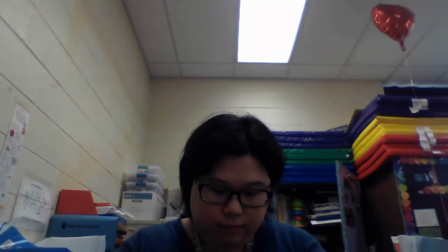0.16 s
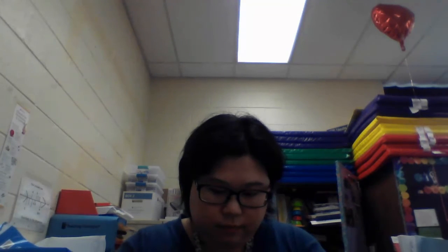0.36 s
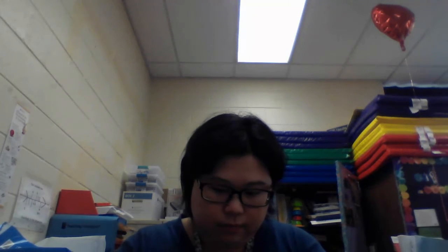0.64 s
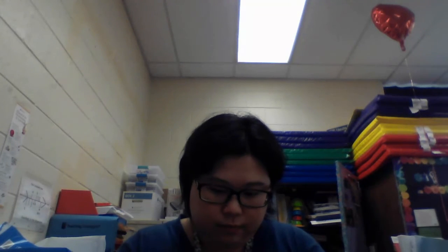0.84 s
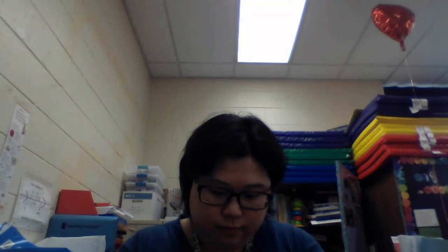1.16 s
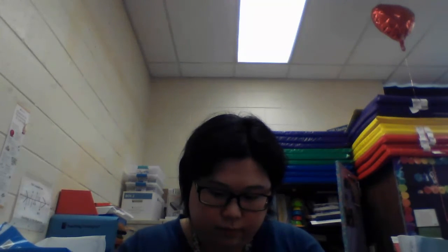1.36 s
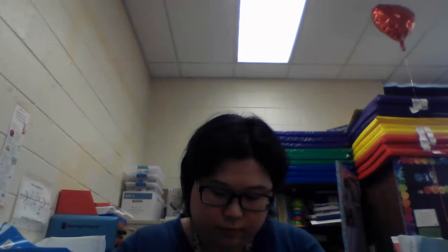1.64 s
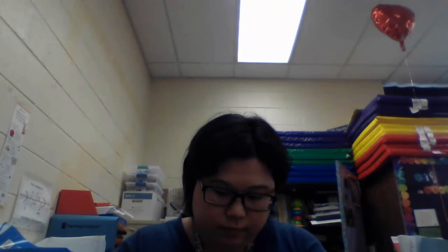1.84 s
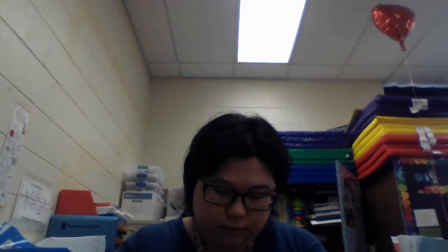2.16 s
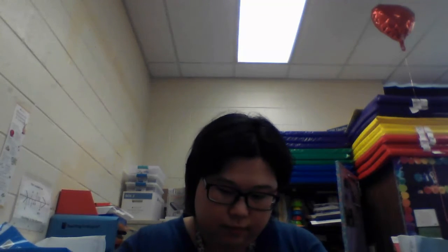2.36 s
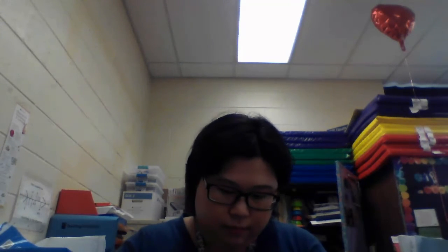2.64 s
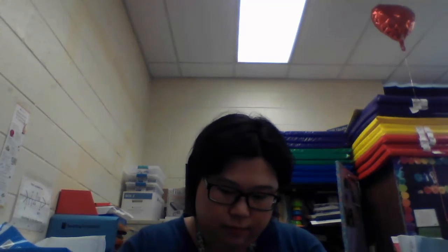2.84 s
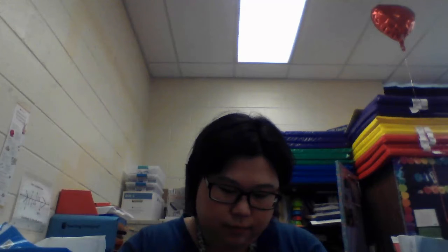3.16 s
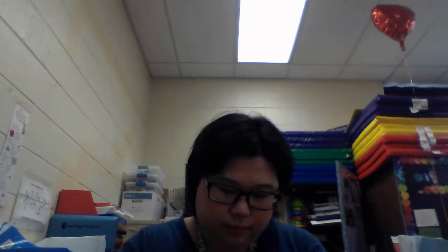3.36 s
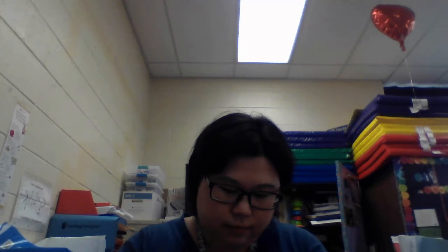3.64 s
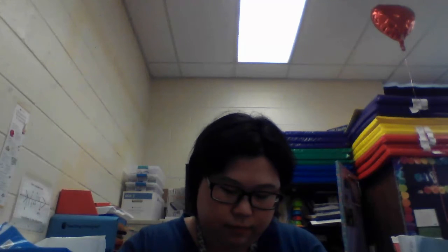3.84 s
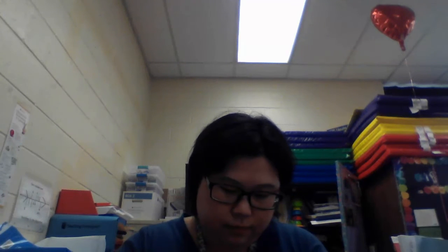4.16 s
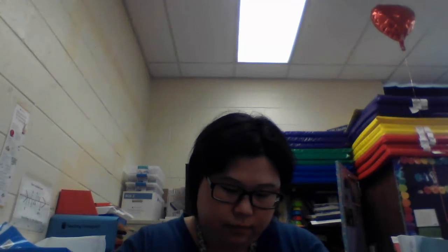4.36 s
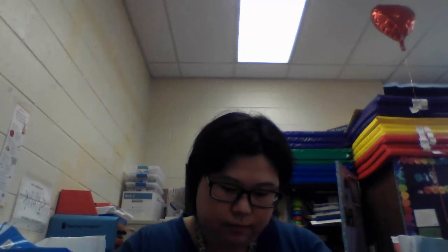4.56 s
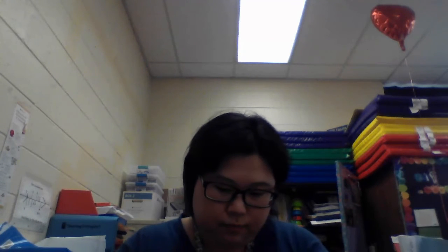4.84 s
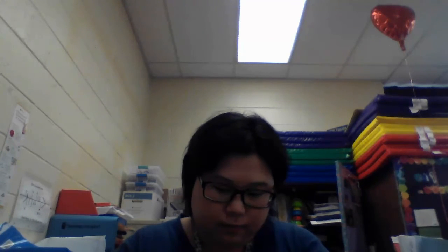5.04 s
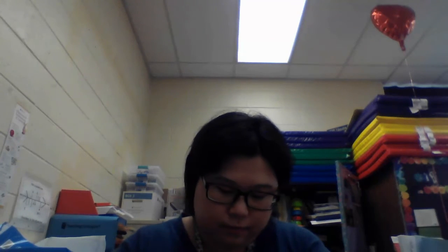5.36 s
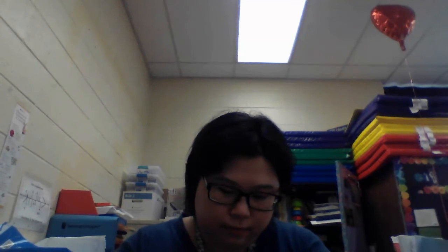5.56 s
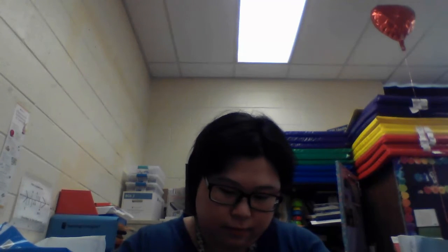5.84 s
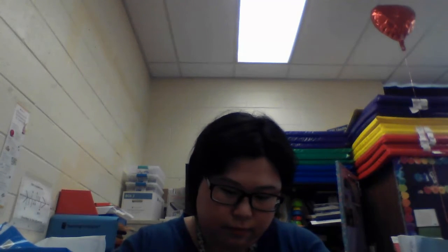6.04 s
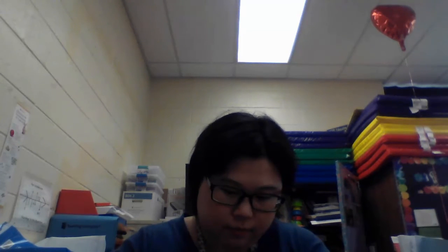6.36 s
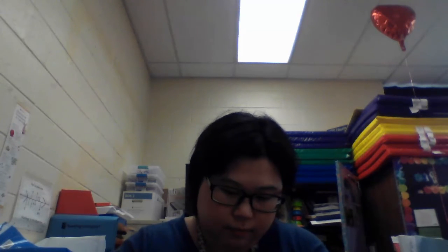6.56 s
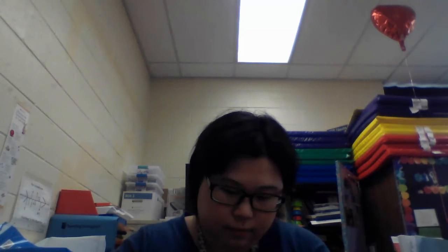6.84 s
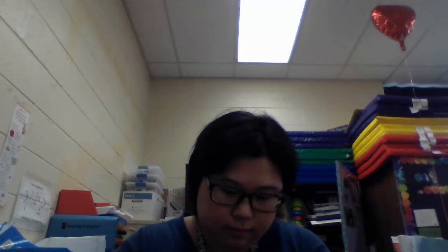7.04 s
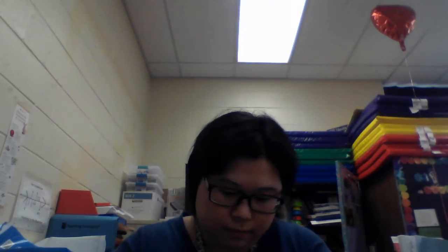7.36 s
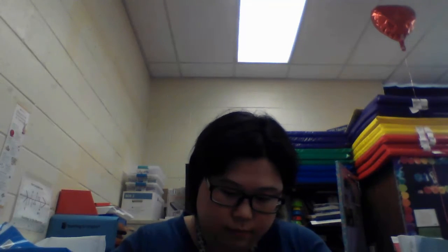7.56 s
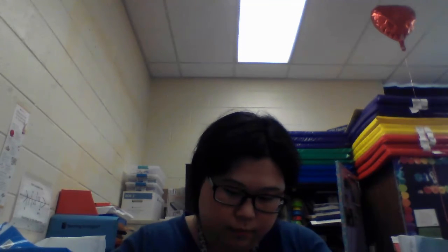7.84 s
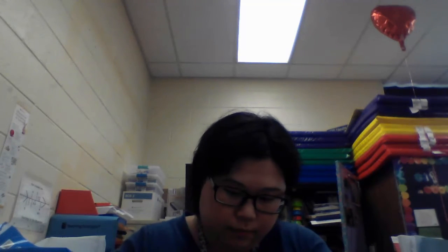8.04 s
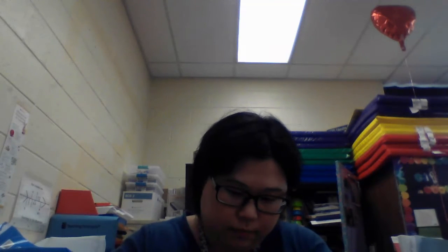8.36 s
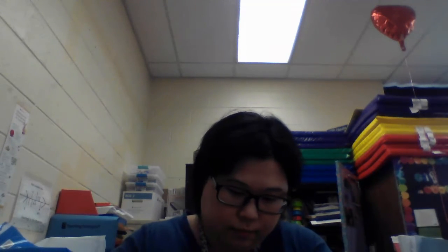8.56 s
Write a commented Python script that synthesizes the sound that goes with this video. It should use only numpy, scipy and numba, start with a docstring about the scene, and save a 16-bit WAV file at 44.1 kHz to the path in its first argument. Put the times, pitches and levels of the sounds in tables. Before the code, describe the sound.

Hard, short, hollow table knocks from a crayon set down repeatedly, with papery clicks and thin hissing drags much quieter than the taps. It begins unevenly, rests for about a second, then continues at a loose steady pace to the end, the last taps strong and close together. Small dry room, close microphone, background hum and ventilation mostly suppressed.

```python
"""A wax crayon is set down hard on paper over a table, dragged in a short stroke and lifted, again and again.
Each touch excites decaying table modes, filtered-noise rattle and a rough click of crayon on paper.
Each stroke is grainy noise: a hiss from the paper fibres over a rumble of the table top.
A laptop microphone hears it in a small quiet room with a hum and ventilation noise.
Its noise suppressor holds this background far down and opens for a moment after loud sounds."""
import sys
import numpy as np
from scipy import signal
from scipy.fft import rfft, irfft
from scipy.io import wavfile
from scipy.ndimage import uniform_filter1d
from numba import njit

SR = 44100
rng = np.random.default_rng(int(sys.argv[2]) if len(sys.argv) > 2 else 0)


def output_pcm(signal):
    """Save a mono or channel-first signal as 16-bit PCM at the path in sys.argv[1].

    Samples are clipped to [-1, 1] before scaling.
    """
    pcm = np.clip(np.atleast_2d(signal).T, -1, 1) * 32767
    wavfile.write(sys.argv[1], SR, np.round(pcm).astype(np.int16))


N = 383229
TIME = np.arange(N) / SR

# Contacts of the crayon with paper and table.
# Each row: time in seconds, then drive levels of table knock, crayon click and low thump, each in dB.
TOUCHES = [(0.025, -29.5, -9.5, -57), (0.037, -31, -21, -64), (0.046, -32, -24.5, -45),
           (0.096, -43, -28.5, -49), (0.159, -46, -38, -49), (0.235, -3, -25, -37.5),
           (0.244, -33, -28, -46), (0.33, -43, -45, -46.5), (0.384, -38.5, -51, -52.5),
           (0.439, -35.5, -50, -57), (0.469, -33.5, -36, -67), (0.478, -27, -15.5, -71),
           (0.487, -30, -23.5, -75), (0.499, -27, -23, -52), (0.554, -46, -60, -48.5),
           (0.659, -3, -30, -44), (0.668, -26, -27, -39), (0.871, -62, -41, -84), (0.889, -31.5, -18, -69),
           (0.903, -30, -23.5, -59), (0.922, -29.5, -27, -55), (0.936, -47, -31, -67),
           (0.956, -50, -34.5, -59), (1.197, -67, -63.5, -79), (1.369, -62, -67.5, -81.5),
           (1.588, -70, -80.5, -84), (1.876, -48.5, -77.5, -87.5), (2.054, -9.5, -44, -43),
           (2.272, -25, -35, -52.5), (2.287, -55, -45, -61), (2.483, -3.5, -30.5, -34.5),
           (2.492, -27.5, -44.5, -42.5), (2.682, -23.5, -31, -48.5), (2.696, -34, -35.5, -53),
           (2.71, -58, -45.5, -58), (2.876, -6.5, -38, -39.5), (3.306, -5, -28.5, -42.5),
           (3.454, -43, -71.5, -72), (3.497, -39, -69, -60), (3.515, -33.5, -43.5, -83.5),
           (3.529, -49.5, -49, -74.5), (3.707, -9, -52, -49), (4.108, -6, -35.5, -43.5),
           (4.483, -29.5, -35, -62.5), (4.491, -9.5, -33.5, -48.5), (5.042, -27, -35.5, -78),
           (5.058, -35, -30.5, -71), (5.09, -45.5, -47.5, -64), (5.167, -55.5, -64.5, -65),
           (5.251, -31, -39, -55), (5.265, -8.5, -43.5, -44.5), (5.651, -51, -67, -76.5),
           (5.818, -2, -38.5, -42), (6.177, -20.5, -77, -67), (6.262, -44, -77, -73),
           (6.527, -5, -38, -38.5), (6.896, -8, -38.5, -52.5), (7.09, -43.5, -46, -76),
           (7.111, -34, -64, -63.5), (7.296, -44, -36, -69), (7.307, -47, -48.5, -70.5),
           (7.34, -65.5, -37, -72), (7.613, -12.5, -55, -49), (7.745, -46, -50.5, -64.5),
           (7.956, -3, -30.5, -36.5), (8.297, -1, -32, -35), (8.322, -22, -37.5, -41),
           (8.613, -1, -25.5, -37.5), (8.636, -17.5, -24.5, -64)]


def touches():
    """Impact excitation: a blow rings, rattles and sways the table; the click is a short rough noise burst."""
    # Spectrum of the after-sound of a knock. Each row: frequency in Hz, relative level in dB.
    rattle_spectrum = [(150, -33), (260, -2), (320, -21), (450, -12.5), (700, -1), (1300, -4.5), (1700, -8),
                       (2100, -14), (3000, -18.5), (5000, -31), (12000, -43)]
    # Spectrum of the click. Each row: frequency in Hz, relative level in dB.
    click_spectrum = [(800, -31.5), (1400, -9), (2100, -24.5), (2900, -5), (3800, -7.5), (4550, 2),
                      (5000, -2.5), (5500, -4.5), (6300, -4), (7300, -16), (8200, -22), (9500, -16),
                      (11000, -25.5), (13000, -55)]
    _, knock_db, click_db, thump_db = np.transpose(TOUCHES)
    push, tap = blows(knock_db), blows(click_db)
    # the paper is pressed flat a few milliseconds before the tip reaches the table
    pressed = np.roll(swell(push, 0.003, 0.03), -int(0.006 * SR))

    after = undb(-15.5) * swell(push, 0.002, 0.074)
    after += undb(-28.0) * swell(push, 0.018, 0.22)
    after += undb(-23.0) * pressed
    rattle = patchy(colour(rng.standard_normal(N), rattle_spectrum), 3.5) * after

    burst = undb(8) * swell(tap, 0.0008, 0.016)
    burst += undb(-4.5) * swell(tap, 0.005, 0.022)
    burst += undb(-38) * pressed
    grit = undb(2.5 * walk(500))
    click = patchy(colour(rng.standard_normal(N), click_spectrum), 3.0, size=256) * burst * grit
    return knocks(knock_db) + rattle + booms(thump_db) + click


def knocks(db):
    """Modal excitation: every blow lands on a new spot, so it stirs the table modes in new shares."""
    # Modes of the table top. Each row: frequency in Hz, mean relative level in dB, 60 dB decay in seconds.
    table_modes = [(257, -31, 0.12), (392, -21, 0.057), (560, -37.5, 0.045), (627.2, -13, 0.14),
                   (868, 2, 0.02), (1108.6, -0.5, 0.013), (1254, 14, 0.0088), (1462, 1, 0.018),
                   (2026, 5.5, 0.016), (2543, -4, 0.014), (2880, -16.5, 0.028)]
    force = blows(db, rebound_s=0.002206, rebound=0.75)
    out = np.zeros(N + SR)
    spots = rng.standard_normal((len(TOUCHES), len(table_modes)))
    for (s, *_), spot in zip(TOUCHES, spots):
        at = int(s * SR)
        modes = [(hz, level_db + 1.2 * shift, t60)
                 for (hz, level_db, t60), shift in zip(table_modes, spot)]
        contact = force[at:at + SR // 300]  # long enough to hold the rebound
        sound = np.convolve(contact, ring(modes))
        out[at:at + len(sound)] += sound
    return out[:N]


def ring(modes, rise_s=0.0012):
    """Modal superposition: a sum of damped sines, which swell while the wax gives; peak 1."""
    t = TIME[:SR // 8]
    y = np.zeros(len(t))
    for k, (hz, db, t60) in enumerate(modes):
        sign = (-1) ** k  # neighbouring modes start in opposite directions
        y += sign * undb(db) * np.sin(2 * np.pi * hz * t) * 1000. ** (-t / t60)
    y *= 1 - np.exp(-(t / rise_s) ** 2)
    return y / np.abs(y).max()


def booms(thump_db):
    """Resonant build-up: the heavy low modes take a few cycles to reach their peak."""
    # Low table modes. Each row: frequency in Hz, time to the peak in seconds.
    low_modes = [(102, 0.017), (174, .045)]
    # Level of each low mode against the thump, in dB.
    low_mode_db = [-1, 0]
    t = TIME[:SR // 2]
    response = np.zeros(len(t))
    for (hz, peak_s), db in zip(low_modes, low_mode_db):
        envelope = (t / peak_s * np.exp(1 - t / peak_s)) ** 2
        response += undb(db) * envelope * np.sin(2 * np.pi * hz * t)
    return signal.fftconvolve(blows(thump_db), response)[:N]


def blows(db, rebound_s=0., rebound=0.):
    """Impulsive force: one impulse a touch, and a rebound of uneven size and delay just after it."""
    force = np.zeros(N + SR)
    at = np.transpose(TOUCHES)[0] * SR
    late, weak = rng.random((len(at), 2)).T
    again = at + rebound_s * SR * (1 + 0.13 * late)
    np.add.at(force, at.astype(int), undb(db))
    np.add.at(force, again.astype(int), undb(db) * rebound * (1 - 0.96 * weak))
    return force[:N]


def swell(force, rise_s, t60):
    """Exponential rise and decay: an envelope convolved with each impulse."""
    t = TIME[:SR // 2]
    envelope = (1 - np.exp(-t / rise_s)) * 1000. ** (-t / t60)
    return np.abs(signal.fftconvolve(force, envelope)[:N])


def strokes():
    """Friction noise: wax drags over paper fibres as dense fine grains; the table top rumbles along."""
    # Spectrum of the paper hiss. Each row: frequency in Hz, relative level in dB.
    paper_spectrum = [(1500, -34), (2600, -10), (3300, -5.5), (4100, -6.5), (4550, -3.5), (5000, -1),
                      (5500, -3), (6500, -4), (7200, -7), (8200, -13), (9500, -7.5), (10500, -11),
                      (11700, -24.5), (14000, -61.5)]
    # Spectrum of the table under the stroke. Each row: frequency in Hz, relative level in dB.
    rumble_spectrum = [(200, -30.5), (400, -10), (800, -5.5), (1300, -7.5), (1900, 1.5), (2500, -11),
                       (4000, -31)]
    hiss, body = drag()
    grain_db = 1.6 * rng.exponential(size=(2, N)) + 1.2 * walk(80)
    fibres = rng.standard_normal((2, N)) * undb(grain_db)
    paper = patchy(colour(fibres[0], paper_spectrum), 3.5)
    table = patchy(colour(fibres[1], rumble_spectrum), 3.5)
    paper = patchy(paper, 3.0, size=128, count=60)  # broad colour shifts as the tip turns
    return hiss * paper + body * table


def drag():
    """Amplitude envelope of sliding: levels of hiss and rumble swell to the fastest moment, then die away."""
    # Strokes and brief scuffs. Each row: fastest moment, speeding-up time and slowing-down time in seconds,
    # peak hiss level in dB, table rumble relative to the hiss in dB.
    stroke_rows = [(.008, .05, 0.034, -60.5, 5.5), (.085, 0.073, .05, -40.5, -12.5),
                   (.17, .08, 0.16, -60.5, 0.5), (.31, 0.11, 0.089, -46, -6),
                   (0.442, 0.079, 0.098, -61.5, 2), (.52, 0.055, .04, -47, -15),
                   (0.561, 0.019, 0.024, -55, -19.5), (0.621, 0.037, 0.066, -68, 4),
                   (0.738, 0.09, 0.13, -46, -3), (0.961, 0.09, 0.1, -47, -11.5),
                   (1.04, 0.066, 0.11, -62.5, -10), (1.19, 0.038, 0.053, -74, -1),
                   (1.378, .015, 0.043, -72, 1), (1.584, .01, .04, -69.5, -6.5),
                   (1.74, 0.053, 0.053, -72.5, -6.5), (1.885, 0.014, 0.02, -73, -6.5),
                   (2.21, 0.2, 0.039, -52, -7), (2.58, 0.24, 0.084, -49, -6), (2.96, 0.15, .12, -57, -13),
                   (3.36, 0.073, 0.1, -51.5, -20), (3.78, 0.17, 0.15, -57, -8),
                   (3.93, 0.018, 0.015, -74.5, 2.5), (4.19, 0.095, 0.088, -50.5, -6),
                   (4.312, 0.029, 0.021, -67, -4.5), (4.57, 0.13, 0.044, -52.5, -12),
                   (4.78, 0.24, 0.14, -55, -16.5), (4.96, 0.026, 0.048, -75, -11),
                   (5.07, 0.027, 0.027, -51, 3), (5.16, .08, 0.18, -66, -11),
                   (5.37, 0.054, .06, -69.5, -6.5), (5.551, .09, 0.044, -66, -7),
                   (5.655, .015, 0.019, -70, -14.5), (5.95, .3, 0.06, -54.5, -25),
                   (6.051, 0.023, 0.02, -70.5, -7.5), (6.239, 0.13, 0.058, -72, 11.5),
                   (6.31, .08, 0.046, -63.5, -10.5), (6.384, 0.018, 0.025, -79.5, -0.5),
                   (6.6, 0.12, 0.11, -56.5, -7), (6.752, 0.024, 0.054, -68.5, -6.5),
                   (6.852, 0.054, .04, -64, -2.5), (6.964, 0.077, 0.079, -39.5, -5.5),
                   (7.171, 0.15, 0.078, -64, -13.5), (7.251, 0.029, .045, -48, -19.5),
                   (7.369, 0.11, 0.048, -60.5, -14.5), (7.467, 0.0077, .02, -73.5, -3.5),
                   (7.56, .03, 0.067, -81, 4.5), (7.745, 0.091, 0.033, -51.5, -6),
                   (7.833, 0.034, 0.027, -60, -15), (7.92, 0.041, 0.084, -79, 8.5),
                   (8.049, 0.19, 0.075, -46.5, -8.5), (8.168, 0.025, 0.023, -61, -17.5),
                   (8.4, 0.29, 0.057, -49, -15), (8.486, 0.016, 0.029, -57.5, -1.5),
                   (8.69, 0.095, .05, -45.5, -6)]
    # Exponents that bend the rise and the fall.
    rise, fall = [1.6, 2.1]
    fade_db = 20  # lost one speeding-up or slowing-down time from the fastest moment
    landing_db = -22  # a knock above this sets the crayon down, and no stroke sounds before it
    hiss, body = np.zeros(N), np.zeros(N)
    landings = [0.] + [s for s, knock_db, *_ in TOUCHES if knock_db > landing_db]
    for s, up_s, down_s, db, share_db in stroke_rows:
        landing = max(a for a in landings if a < s)
        start = max(s - 4 * up_s, landing)
        span = slice(int(start * SR), int((s + 4 * down_s) * SR))
        t = TIME[span] - s
        fade = np.where(t < 0, np.abs(t / up_s) ** rise, np.abs(t / down_s) ** fall)
        gain = undb(db - fade_db * fade)
        hiss[span] += gain
        body[span] += gain * undb(share_db)
    return hiss, body


def room(x):
    """Diffuse reverberation: a noise tail, each band dying at its own rate, is added to the direct sound."""
    # Bands of the room tail. Each row: centre in Hz, 60 dB decay in seconds, level in dB.
    tail_bands = [(1312, 0.39, -34.5), (5350, 0.083, -20.5)]
    t, tail = TIME[:SR // 2], 0
    for hz, t60, db in tail_bands:
        octaves = signal.butter(2, [hz / 2, hz * 2], "band", fs=SR, output="sos")
        band = signal.sosfilt(octaves, rng.standard_normal(len(t)))
        band *= 1000. ** (-t / t60) * (t > 0.004)  # first echoes come after 4 ms
        tail = tail + undb(db) * band / np.sqrt(np.sum(band ** 2) * 0.38)
    return x + signal.fftconvolve(x, tail)[:N]


def suppressor(near, open_db=-22, depth_db=36, fall_db_s=170, slope=0.69, smooth_s=0.023, lag_s=0.0036,
               sink_db_s=11, rest_db=19):
    """Downward expansion: gain on the background, low in silence, opened by loud sounds, closing gradually."""
    loud = follow(uniform_filter1d(np.abs(near), 200), float(undb(-fall_db_s / SR)))
    gain_db = np.clip(slope * (20 * np.log10(loud + 1e-9) - open_db), -depth_db, 0)
    # the gain first rests at a floor, which keeps sinking in long silence
    settled = follow(undb(gain_db), float(undb(-sink_db_s / SR)))
    gain_db = np.maximum(gain_db, 20 * np.log10(settled) - rest_db)
    smooth_db = uniform_filter1d(gain_db, int(smooth_s * SR))
    return undb(np.interp(TIME - lag_s, TIME, smooth_db))


@njit
def follow(x, release):
    """Peak detection: rises at once and falls by a fixed ratio each sample."""
    y, e = np.empty(len(x)), 0.
    for i in range(len(x)):
        e = max(x[i], e * release)
        y[i] = e
    return y


def background():
    """Stationary noise: a machine hum of pure tones that wavers a little, over ventilation noise."""
    # Hum tones. Each row: frequency in Hz, mean rms level before suppression in dB.
    hum_tones = [(174, -48.5), (524, -68.5)]
    # Spectrum of the ventilation. Each row: frequency in Hz, relative level in dB.
    air_spectrum = [(30, -33.5), (100, -6), (145, -10), (280, -8), (330, -14.5), (700, -19.5), (1500, -30),
                    (6500, -38), (11500, -49), (14000, -61)]
    air_db = -52.5  # rms level before suppression
    waver_db = 1.2 * walk(4)
    hum = np.zeros(N)
    for hz, db in hum_tones:
        hum += undb(db + waver_db) * np.sqrt(2) * np.sin(2 * np.pi * hz * TIME)
    air = patchy(colour(rng.standard_normal(N), air_spectrum), 3.5, size=2048)
    return hum + undb(air_db) * air


def undb(db):
    """Logarithmic level: decibels to amplitude gain."""
    return 10 ** (np.asarray(db) / 20)


def unit(x):
    """Normalisation: scale to rms 1."""
    return x / np.sqrt(np.mean(x ** 2))


def colour(x, points):
    """Spectral filtering: shape by (Hz, dB) points joined on a log-frequency axis; rms 1."""
    hz, db = np.transpose(points)
    axis = np.log(np.arange(N // 2 + 1) * SR / N + 1)  # 1 Hz added to keep the log finite
    return unit(irfft(rfft(x) * undb(np.interp(axis, np.log(hz), db)), N))


def walk(rate):
    """Slow random modulation: a new random level every 1 / rate seconds, joined by ramps."""
    k = int(SR / rate)
    held = np.repeat(rng.standard_normal(N // k + 1), k)
    return uniform_filter1d(held, k)[:N]


def patchy(x, depth_db, size=1024, count=3):
    """Time-frequency modulation: narrow streaks of pitch flicker in level; rms 1."""
    z = signal.stft(x, nperseg=size)[2]
    across_pitch = uniform_filter1d(rng.standard_normal(z.shape), size=2, axis=0)
    patches = uniform_filter1d(across_pitch, size=count, axis=1)
    flickering = z * undb(depth_db * unit(patches))
    return unit(signal.istft(flickering, nperseg=size)[1][:N])


def scene():
    """Mid-side stereo: one microphone feeds both channels; only the top treble differs a little."""
    near = room(touches() + strokes())
    mid = near + suppressor(near) * background()
    treble_band = signal.butter(6, [6500, 10500], "band", fs=SR, output="sos")
    treble = signal.sosfilt(treble_band, mid)
    lean = np.tanh(3 * uniform_filter1d(walk(300), 60))  # wanders between the two sides
    side = undb(-10) * treble * lean
    return np.array([mid + side, mid - side])


def record(dry):
    """Band limiting and saturation: deep bass is lost, the highest peaks round, the top is cut steeply."""
    bass_cut = signal.butter(2, 55, "high", fs=SR, output="sos")
    thin = signal.sosfilt(bass_cut, dry)
    soft = thin / (1 + (thin / 0.9) ** 4) ** 0.25
    top_cut = signal.ellip(8, 0.2, 65, 11800, fs=SR, output="sos")  # ripple dB, stopband dB, edge Hz
    return signal.sosfilt(top_cut, soft)


dry = scene()
out = record(dry)
output_pcm(out)
```